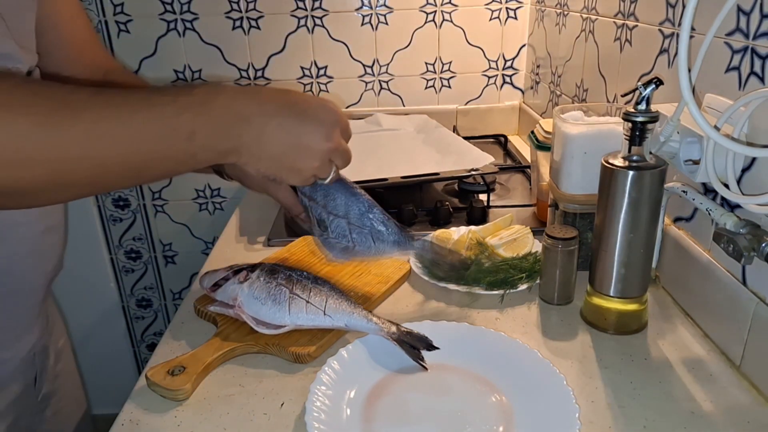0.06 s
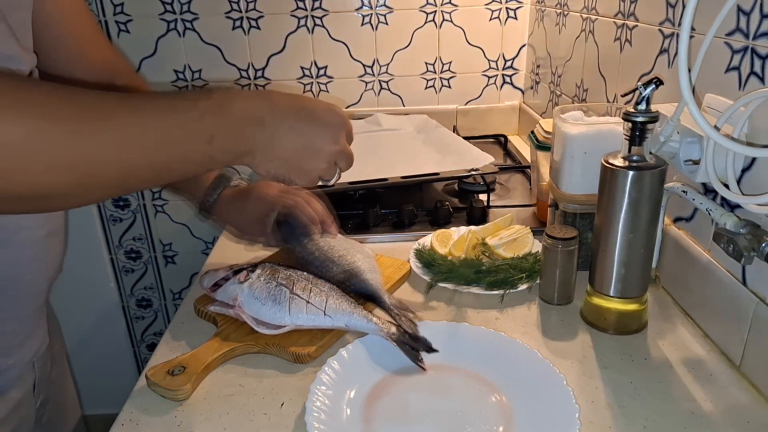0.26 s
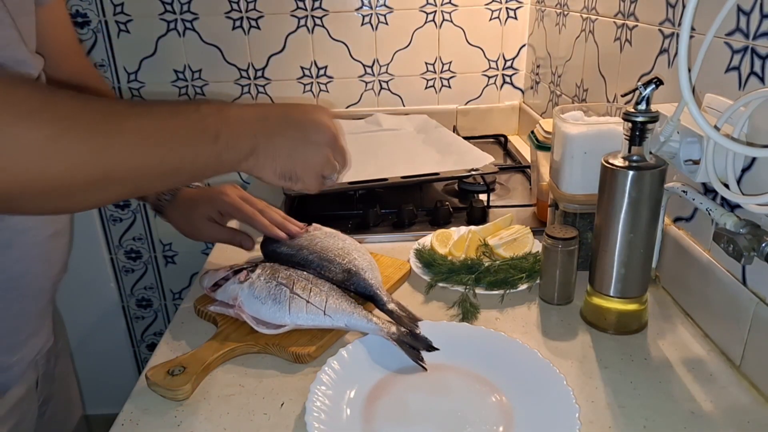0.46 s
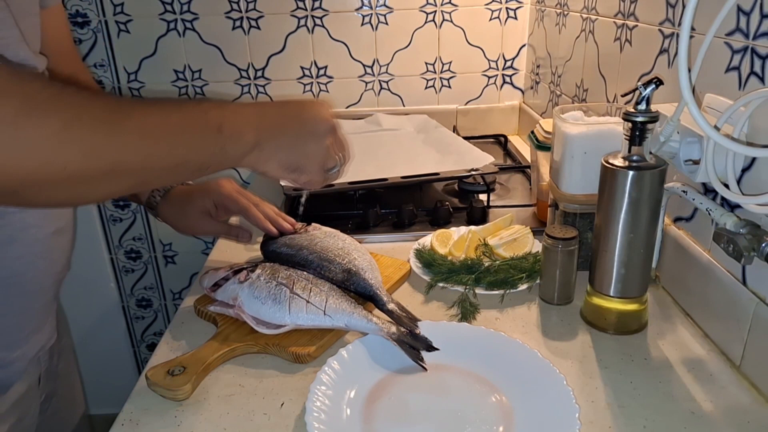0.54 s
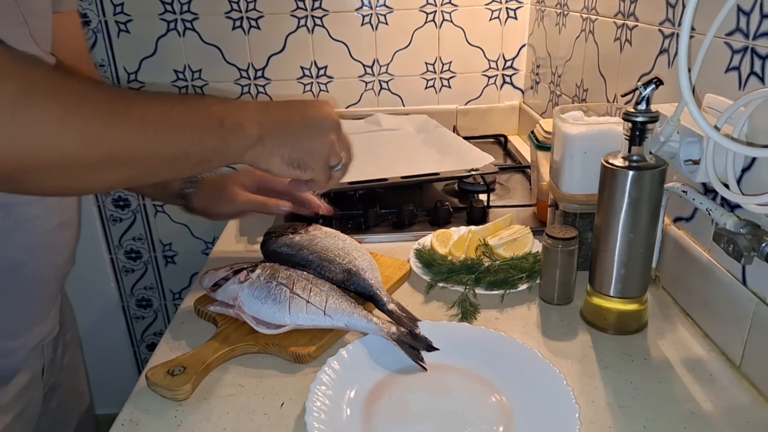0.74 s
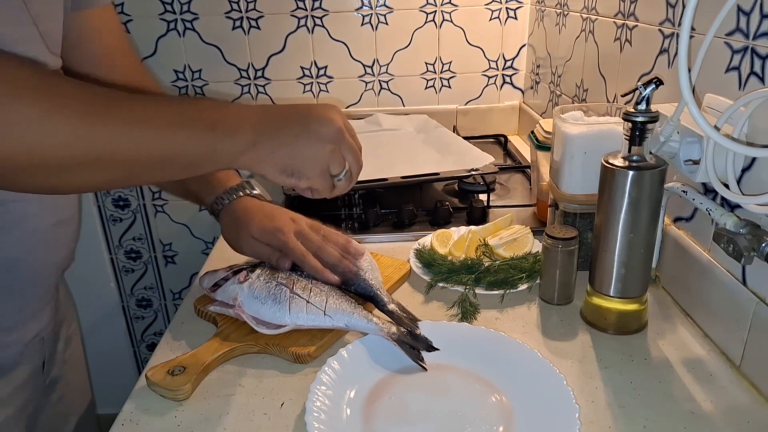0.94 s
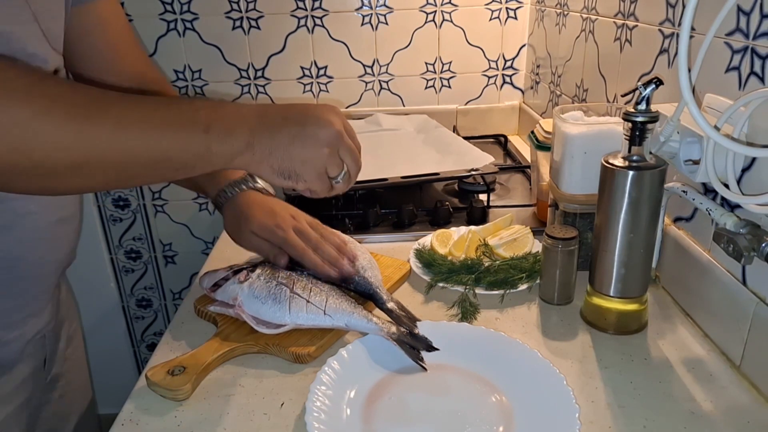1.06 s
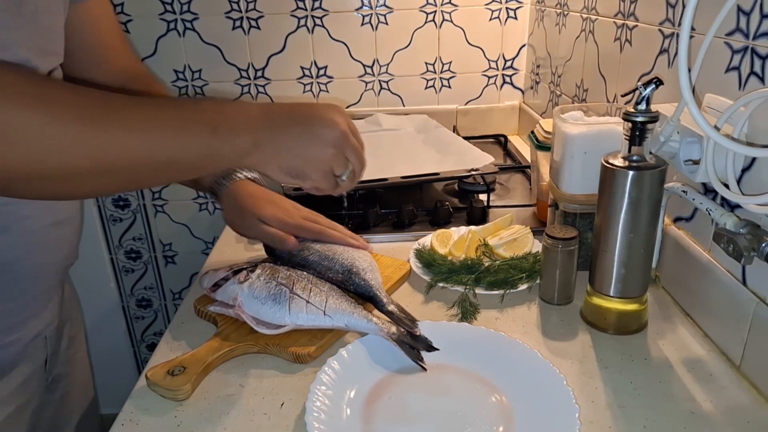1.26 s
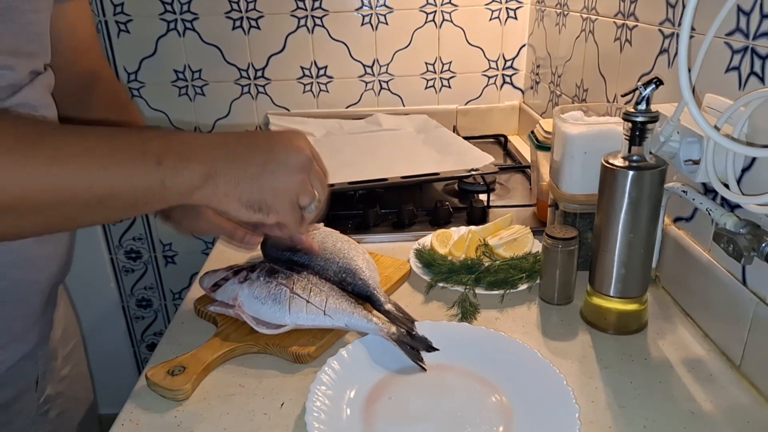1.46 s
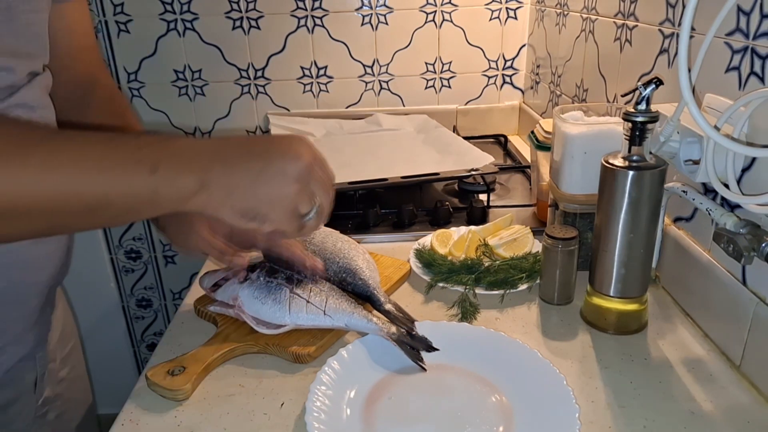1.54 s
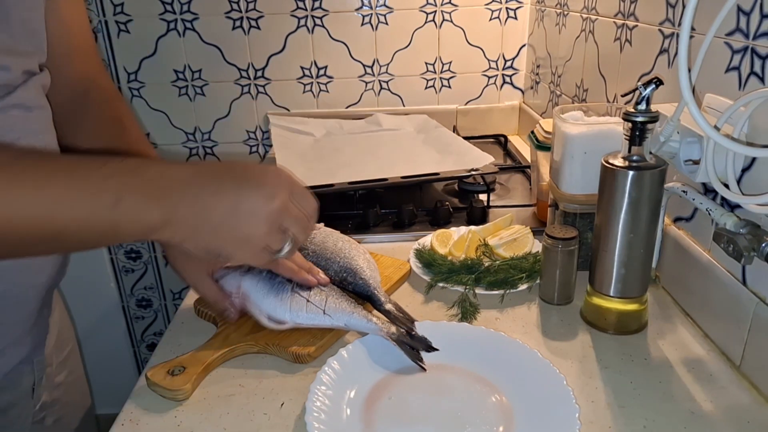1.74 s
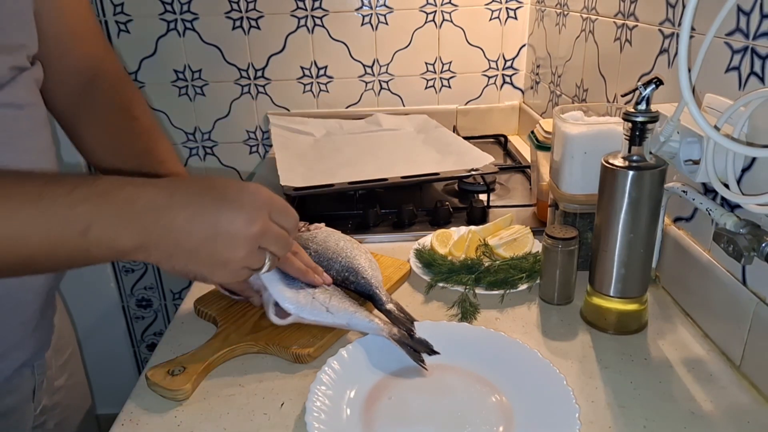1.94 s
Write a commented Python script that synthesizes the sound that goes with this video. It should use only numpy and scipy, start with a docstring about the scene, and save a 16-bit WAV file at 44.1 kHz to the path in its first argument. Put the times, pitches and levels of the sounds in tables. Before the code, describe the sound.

In a small, slightly echoing kitchen, a wet fish thuds onto a wooden board that knocks against the counter. Quiet, close strokes over the scales follow, with damp clicks and a few hollow taps over a low room rumble.

```python
"""A wet fish dropped on a board

In a small tiled kitchen a fish lands on a wooden board: the tail slaps, the body thuds and
the board knocks on the counter. Then a hand rubs the scales in short strokes, with sticky
squishes and ticks, and nudges the fish with a few hollow taps. A low rumble lies underneath."""
import sys
import numpy as np
from scipy import signal
from scipy.fft import rfft, irfft
from scipy.io import wavfile

SR = 44100
rng = np.random.default_rng(int(sys.argv[2]) if len(sys.argv) > 2 else 0)


def wav_out(sig):
    """Save sig, one row per channel (or a flat mono array), as 16-bit PCM at SR to the path in sys.argv[1]."""
    wavfile.write(sys.argv[1], SR, np.round(np.clip(np.atleast_2d(sig).T, -1, 1) * 32767).astype(np.int16))


N = 88200
T = np.arange(N) / SR
HZ = np.fft.rfftfreq(N, 1 / SR)


def amp(db):
    """Turns decibels into a gain."""
    return 10 ** (np.asarray(db) / 20)


def unit(x):
    """Scales a signal to an average power of one."""
    return x / np.sqrt(np.mean(x ** 2) + 1e-20)


def read(points, hz):
    """Reads between the rows of a table, along a scale of octaves."""
    freqs, values = np.transpose(points)
    return np.interp(np.log(hz + 1), np.log(freqs + 1), values)


def noise():
    """Two unrelated white noises."""
    return rng.standard_normal((2, N))


def grains(per_second=6000, spread_db=1.8):
    """Dense tiny clicks of uneven size, as wet scales stick and let go."""
    size = amp(spread_db * np.minimum(rng.exponential(1, N), 4))
    return noise() * size * (rng.random(N) < per_second / SR)


def burst(start, rise, decay):
    """The loudness of a hit: a straight rise, then a fade."""
    return np.clip((T - start) / rise, 0, 1) * np.exp(-np.maximum(T - start - rise, 0) / decay)


def swell(start, length):
    """The pressure of a push: it rises quickly and eases off."""
    return np.sin(np.pi * np.clip((T - start) / length, 0, 1) ** 0.81)


def ring(start, hz, ring_time):
    """One struck tone. Its ring time is the seconds it takes to fade by 60 dB."""
    age = np.maximum(T - start, 0)
    return np.sin(2 * np.pi * hz * age) * np.exp(-np.log(1000) * age / ring_time)


def pan(x, db):
    """Raises the left side and lowers the right."""
    return x * amp([[db], [-db]])


# How alike the two sides sound. Each row: frequency in Hz, likeness from 0 to 1.
LIKENESS = [(30, 0.79), (130, 0.97), (300, 0.56), (700, 0.27), (1400, 0)]

def colour(x, points, tilt_db=0):
    """Shapes two noises into a left and right pair. Tilt adds dB per octave above 1000 Hz."""
    left, other = rfft(x)
    likeness = read(LIKENESS, HZ)
    right = likeness * left + np.sqrt(1 - likeness ** 2) * other
    gain = amp(read(points, HZ) + tilt_db * np.log2(np.maximum(HZ, 1000) / 1000))
    return unit(irfft(np.array([left, right]) * gain, N))


# The kitchen's echo. Each row: frequency in Hz, ring time in seconds.
ROOM_RING = [(60, 0.037), (100, .22), (150, 0.79), (300, 0.35), (1000, 0.52), (3000, 0.46), (7000, 0.55),
             (15000, 0.39)]

def kitchen(x, echo_db):
    """Adds the echo of the tiled walls, each band fading at its own speed."""
    hz, t, bands = signal.stft(colour(noise(), [(0, 0), (SR, 0)]), SR, nperseg=256)
    fade = np.exp(-np.log(1000) * t / read(ROOM_RING, hz)[:, None])
    tail = signal.istft(bands * fade, SR, nperseg=256)[1][:, :N]
    tail *= np.clip((T - 0.003) / 0.0026, 0, 1)  # the echo arrives after 3 ms
    tail /= np.linalg.norm(tail[0])
    return x + amp(echo_db) * signal.fftconvolve(np.atleast_2d(x), tail, axes=1)[:, :N]


# The tone of the room noise. Each row: frequency in Hz, relative level in dB.
RUMBLE_COLOUR = [(15, -39), (30, -6.5), (50, 8), (72, -3.5), (100, 2), (135, -9.5), (200, -17), (400, -26),
                 (800, -32), (1500, -46.5), (3000, -49), (6000, -47), (7500, -38), (9000, -47),
                 (12000, -62)]
# The drift of its bass. Each row: time in seconds, gain in dB.
BASS_DRIFT = [(0, -47), (.2, -52), (.4, -52), (.62, -56.5), (.8, -52.5), (1.1, -55.5), (1.55, -54.5),
              (2, -52)]
# A steady machine hum. Each row: pitch in Hz, level in dB.
HUM_TONES = [(49.5, -60), (99, -62), (446, -78.5)]

def rumble(bass_top_hz=155, air_db=-51.5):
    """Low room noise whose bass drifts in level, with a faint hum."""
    hum = sum(amp(db) * np.sqrt(2) * np.sin(2 * np.pi * (hz * T + rng.random())) for hz, db in HUM_TONES)
    air = colour(noise(), RUMBLE_COLOUR)
    bass = irfft(rfft(air) / (1 + (HZ / bass_top_hz) ** 4), N)
    drift = amp(np.interp(T, *np.transpose(BASS_DRIFT)))
    return pan(amp(air_db) * (air - bass) + drift * bass + hum, db=0.78)


# Light nudges. Each row: start in seconds, level in dB, pitch in Hz.
NUDGES = [(1.105, -56, 648), (1.758, -51, 724), (1.7645, -46.5, 741), (1.777, -51.5, 838)]

def taps():
    """Nudged things give small hollow taps, one short tone each."""
    tones = sum(amp(db) * ring(start, hz, ring_time=0.077) for start, db, hz in NUDGES)
    return kitchen(tones, echo_db=-8)


# The tone of wet skin. Each row: frequency in Hz, relative level in dB.
SKIN_COLOUR = [(100, -11), (600, -3.5), (1300, -2.5), (2100, 1.5), (2700, -2.5), (3500, 0), (4500, 3),
               (5800, 4), (7500, 7.5), (8800, -1.5), (12000, 2), (16000, -6.5)]

def wet_skin(x, tilt_db):
    """Gives noise the bright sound of wet skin."""
    return colour(x, SKIN_COLOUR, tilt_db)


# Fingers peeling off the skin. Each row: start in seconds, level in dB.
PEELS = [(0.8823, -60), (0.9389, -48.5), (1.0045, -67), (1.0464, -60), (1.1282, -56), (1.459, -60),
         (1.479, -57), (1.493, -60), (1.577, -61)]

def ticks():
    """Each time a finger comes unstuck it gives one short wet click."""
    level = sum(amp(db) * burst(start, rise=0.0005, decay=0.0028) for start, db in PEELS)
    return kitchen(level * wet_skin(noise(), tilt_db=3.5), echo_db=-6)


# The dull rustle of moving arms and flesh. Each row: time in seconds, level in dB.
RUSTLE_LEVEL = [(0, -73.5), (.65, -73), (.93, -72), (1.02, -73), (1.12, -70), (1.22, -71.5), (1.32, -64.5),
                (1.42, -71), (1.55, -72.5), (1.7, -64), (1.92, -66.5), (2, -67.5)]
# The tones of that rustle and of rubbed scales. Each row: frequency in Hz, relative level in dB.
RUSTLE_COLOUR = [(60, -29), (250, 0), (620, 8), (900, 5), (1200, 1), (1500, 0.5), (2200, -3), (3000, -10),
                 (7000, -12), (12000, -14.5), (16000, -101)]
SCALE_COLOUR = [(100, -4), (600, 8.5), (1300, -7), (2200, 0), (3300, -2), (4000, 1), (4700, 2.5),
                (6300, -1.5), (7500, 1.5), (8800, -4), (12000, -3), (16000, -16)]
# Hand strokes. Each row: start and length in seconds, level in dB, tilt in dB per octave.
STROKES = [(0.458, 0.13, -69, -0.5), (0.63, 0.82, -71.5, 2), (0.866, 0.12, -58, 7),
           (1.028, 0.145, -62, 5.5), (1.105, 0.1, -62.5, -0.5), (1.246, 0.16, -61, 2),
           (1.366, 0.14, -65, 0.5), (1.456, 0.034, -63, 3.5), (1.494, 0.14, -68, 5.5),
           (1.748, 0.058, -64, 6), (1.981, 0.064, -58.5, -4.5)]
# Wet skin under the fingers. Each row: start and length in seconds, level in dB, pitch in Hz.
SQUISHES = [(0.494, 0.057, -64.5, 5720), (0.656, 0.068, -64.5, 5000), (0.742, 0.17, -69, 5460),
            (0.921, 0.08, -67.5, 587), (1.305, 0.043, -63, 6300), (1.314, 0.074, -67.5, 480),
            (1.418, .046, -62.5, 5300), (1.465, .16, -68.5, 1080), (1.563, 0.042, -63, 5300),
            (1.977, 0.061, -59.5, 1310)]

def hand(width_below=0.31, width_above=0.38, low_cut_db=26):
    """A hand rustles, rubs the scales and squishes the skin, which sticks and slips unevenly."""
    out = amp(np.interp(T, *np.transpose(RUSTLE_LEVEL))) * colour(noise(), RUSTLE_COLOUR)
    flutter_db = unit(irfft(rfft(noise()[0]) * (HZ < 70), N))  # about 1 dB, slower than 70 Hz
    grip = amp(flutter_db)
    for start, length, db, tilt in STROKES:
        out += amp(db) * swell(start, length) * unit(grip * colour(grains(), SCALE_COLOUR, tilt))
    for start, length, db, hz in SQUISHES:
        # A narrow band of noise: widths are in octaves, the low cut in dB per octave.
        octaves = np.log2((HZ + 1) / hz)
        width = np.where(octaves < 0, width_below, width_above)
        band_db = -20 * np.log10(1 + (octaves / width) ** 2)
        band_db += low_cut_db * np.minimum(octaves + width_below, 0)
        squish = colour(noise(), np.transpose([HZ, band_db]))
        out += amp(db) * swell(start, length) * unit(grip * squish)
    return pan(kitchen(out, echo_db=-6), db=0.9)


# The board hitting the counter. Each row: start in seconds, gain in dB.
KNOCKS = [(0.2235, -41), (.2628, -25.5), (.2700, -31), (0.2931, -38.5)]
# The board's own tones. Each row: pitch in Hz, relative level in dB, ring time in seconds.
BOARD_TONES = [(134, -18, 0.49), (152, -19, 0.85), (220.1, -12.5, 0.34), (271.4, -19.5, .25),
               (319.5, -9.5, .13), (474.2, -11.5, 0.34), (614, -10, 0.37), (754, -14.5, 0.23),
               (807, -16.5, 0.12), (884, -20, 0.18), (958, -26, 0.19), (1079, -25, 0.25), (1321, -18, 0.18)]
# The dense rattle of wood. Each row: frequency in Hz, relative level in dB.
CLACK_COLOUR = [(60, -1.5), (250, 2.5), (400, -2.5), (700, 0.5), (1100, -8), (1500, -15.5), (2100, -15),
                (2700, -18), (4500, -16.5), (8000, -24.5), (16000, -27.5)]

def board(clack_db=-10.5):
    """Each knock sets the board ringing over a short woody clack."""
    tones = sum(amp(db) * ring(0, hz, ring_time) for hz, db, ring_time in BOARD_TONES)
    rings = sum(amp(db) * np.interp(T - start, T, tones, left=0) for start, db in KNOCKS)
    level = sum(amp(db + clack_db) * burst(start, rise=0.0013, decay=0.014) for start, db in KNOCKS)
    clack = level * colour(noise(), CLACK_COLOUR)
    return kitchen(rings, echo_db=-7) + kitchen(clack, echo_db=-0.5)


# A flick of the tail fin. One row: start in seconds, level in dB, pitch in Hz, ring time in seconds.
FIN_FLICK = (0.36, -40.5, 7400, 0.04)
# The slap's thin ring. Each row: pitch in Hz, level in dB, ring time in seconds.
SLAP_TONES = [(4483, -48, .22), (7418, -45, .19), (9663, -51, .16), (12160, -51, .14)]
# Wet smacks. Each row: start in seconds, level in dB, rise and decay in seconds, tilt in dB per octave.
SMACKS = [(.2160, -41, 0.0011, 0.003, 1), (.2217, -38.5, .0004, .012, -1.5),
          (.2245, -38, 0.0045, 0.018, -4), (.246, -43, .007, .017, -14), (0.27, -50.5, 0.0023, 0.047, -8),
          (0.3434, -44.5, .0015, 0.0057, 0), (.350, -48, .0022, .005, 17), (.376, -56.5, 0.0018, .012, 5)]

def smacks(slap_start=0.2225, hiss_db=-4.5):
    """Wet skin meets wood in bursts of tiny clicks. The slap leaves a thin ring and the fin pings."""
    start, db, hz, ring_time = FIN_FLICK
    out = amp(db) * ring(start, hz, ring_time)
    out += sum(amp(db) * ring(slap_start, hz, ring_time) for hz, db, ring_time in SLAP_TONES)
    for start, db, rise, decay, tilt in SMACKS:
        splat = unit(grains()) + amp(hiss_db) * noise()
        out = out + amp(db) * burst(start, rise, decay) * wet_skin(splat, tilt)
    return kitchen(out, echo_db=-7.5)


# The counter's boom. One row: start and length in seconds, level in dB, pitch in Hz.
COUNTER_BOOM = (.2185, .15, -33.5, 51.5)
# Soft blows of the body. Each row: time of the peak in seconds, level in dB, pitch in Hz.
THUDS = [(0.2331, -26.5, 87), (.236, -36.5, 318), (0.2531, -26.5, 100), (.2760, -25.5, 130),
         (0.2885, -31.5, 149), (.331, -37.5, 90), (0.3457, -31.5, 140), (.549, -40.5, 102),
         (1.6419, -43, 122)]

def body():
    """The counter flexes under the fish's weight, and each soft blow is one low push and rebound."""
    start, length, db, hz = COUNTER_BOOM
    out = amp(db) * swell(start, length) * np.sin(2 * np.pi * hz * (T - start))
    for peak_time, db, hz in THUDS:
        from_peak = np.pi * hz * (T - peak_time)
        out += amp(db) * (2 * from_peak ** 2 - 1) * np.exp(-from_peak ** 2)
    return kitchen(out, echo_db=-10)


def scene():
    """The drop, the handling and the room, added together."""
    return body() + board() + smacks() + hand() + ticks() + taps() + rumble()


# How the microphones differ. Each row: frequency in Hz, left level minus right level in dB.
MIC_BALANCE = [(30, 3), (120, -1.5), (300, 4), (1000, 1.2), (4000, -.5), (8000, -3.5)]

def record(dry, lag_s=0.00008, top_hz=15750):
    """Two close microphones of slightly different tone, with the highest treble cut off."""
    left, right = rfft(dry)
    lean = amp(read(MIC_BALANCE, HZ) / 2)
    lag = np.exp(-2j * np.pi * np.minimum(HZ, 1000) * lag_s)  # the delay shrinks above 1000 Hz
    pair = irfft(np.array([left * lean, right / lean * lag]), N)
    low_pass = signal.firwin(511, top_hz, window=("kaiser", 9), fs=SR)
    return signal.oaconvolve(pair, low_pass[None], "same")


dry = scene()
out = record(dry)
wav_out(out)
```